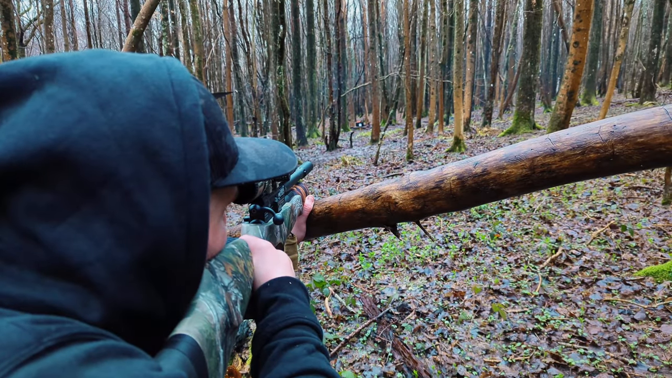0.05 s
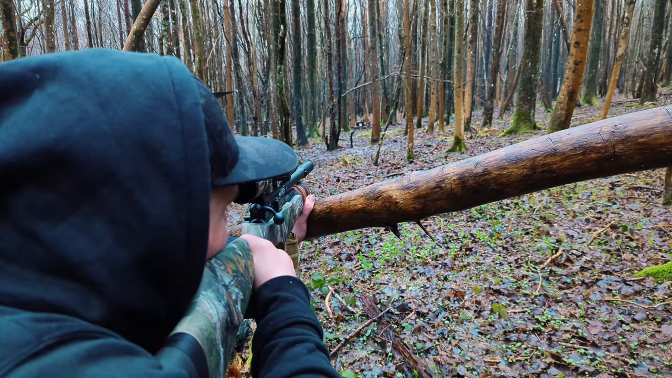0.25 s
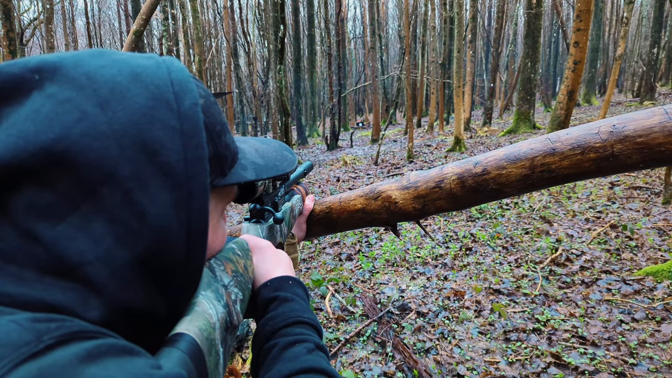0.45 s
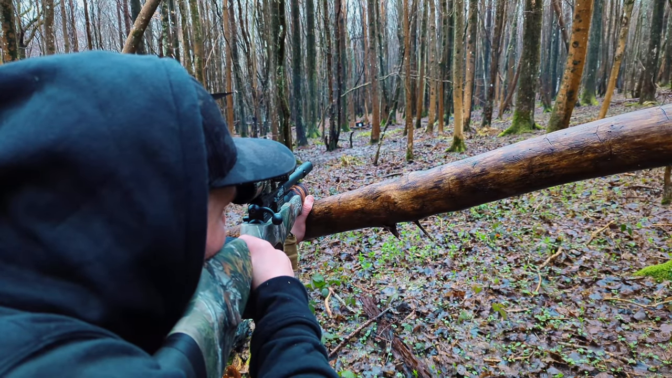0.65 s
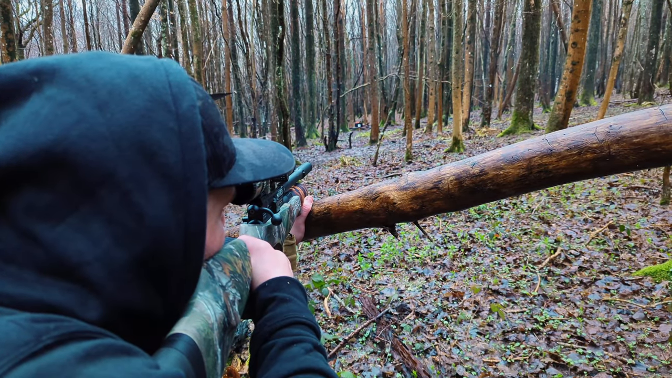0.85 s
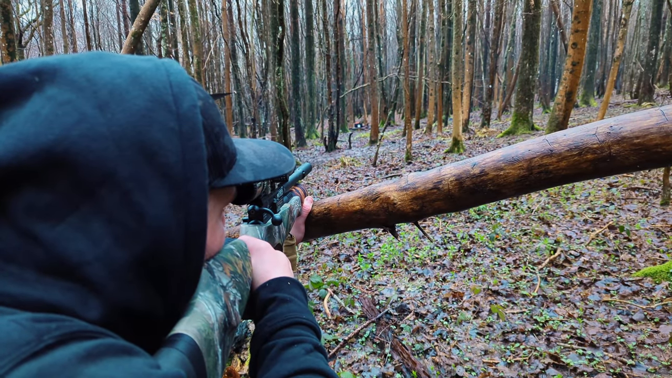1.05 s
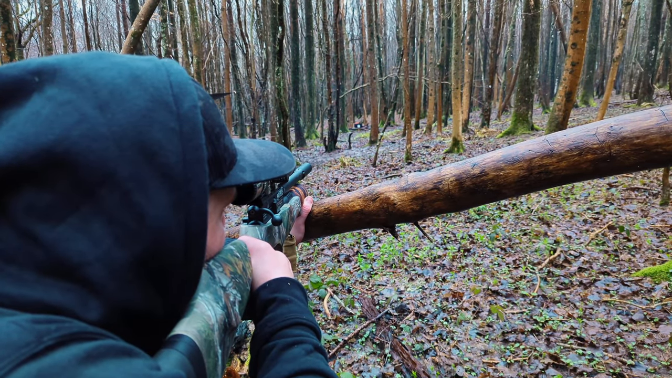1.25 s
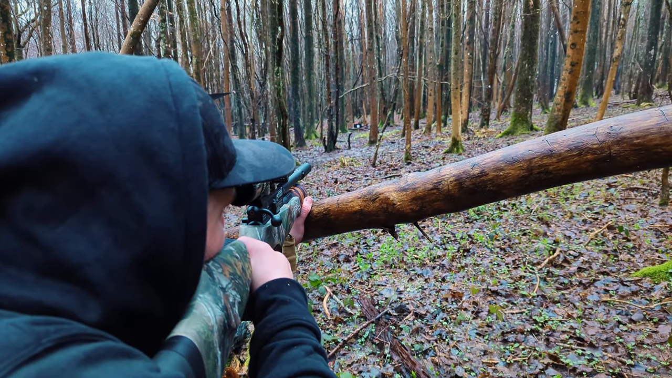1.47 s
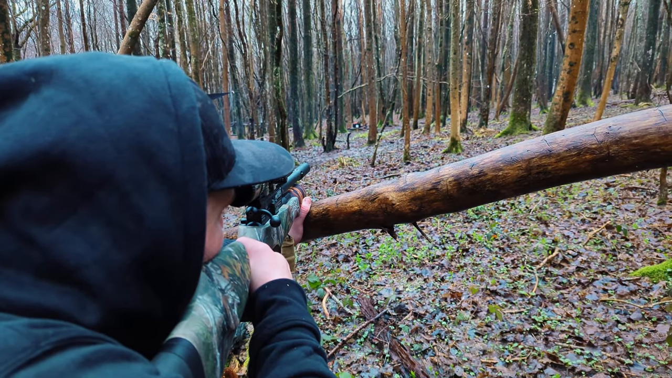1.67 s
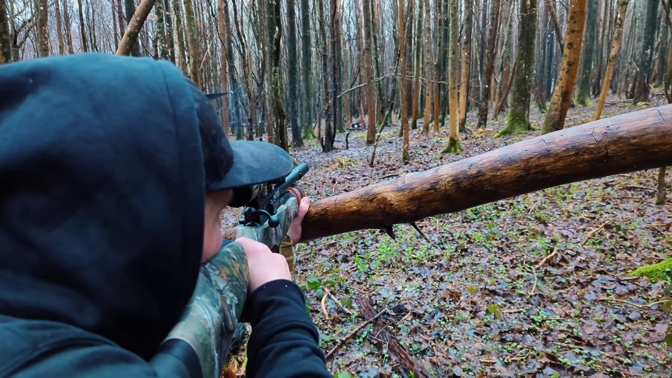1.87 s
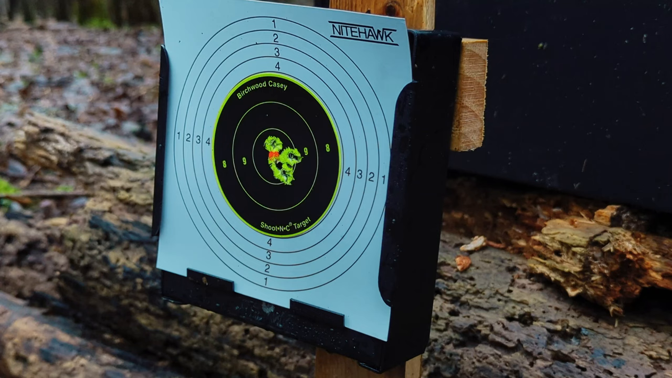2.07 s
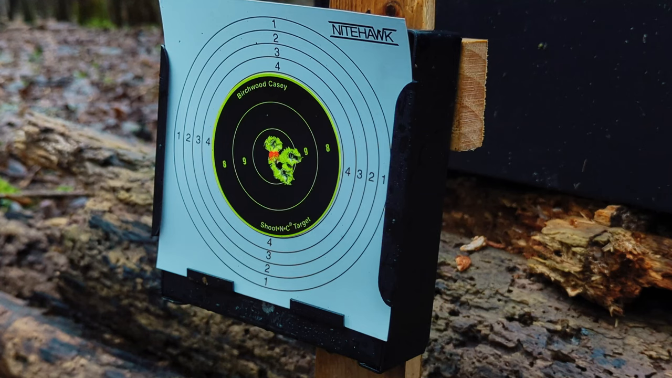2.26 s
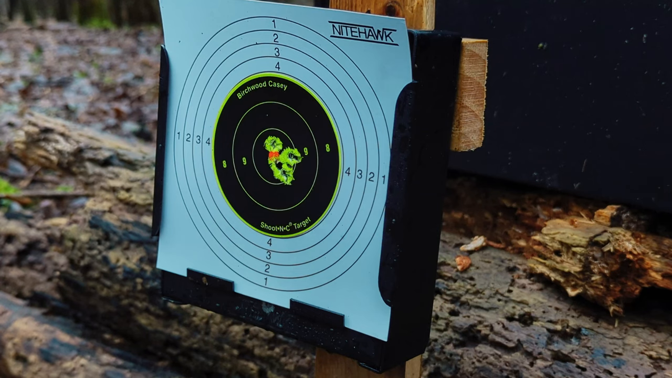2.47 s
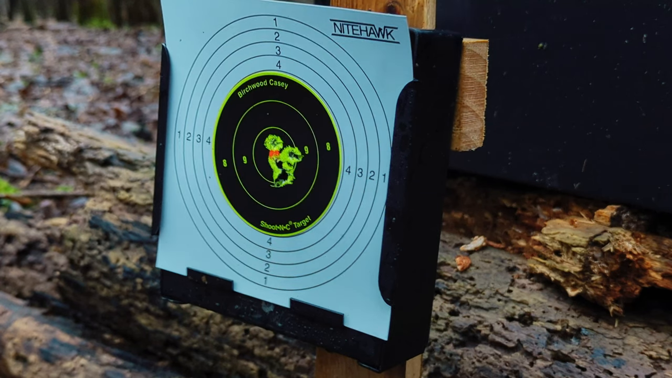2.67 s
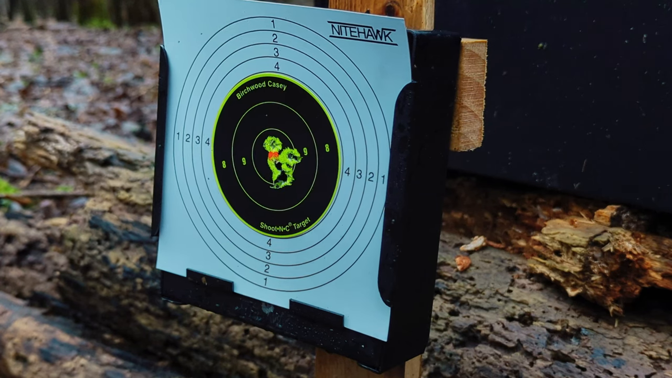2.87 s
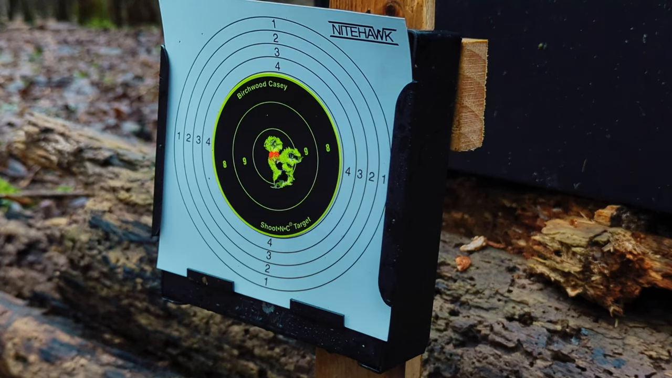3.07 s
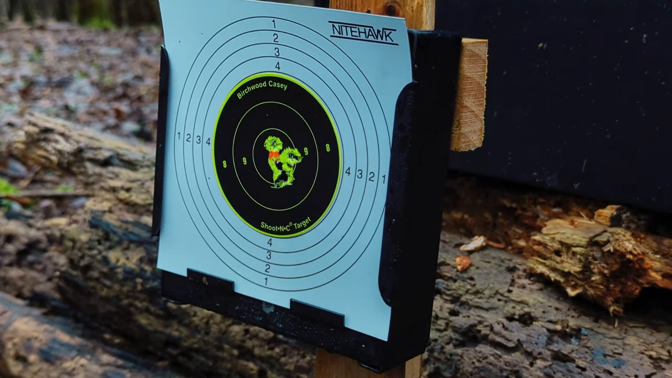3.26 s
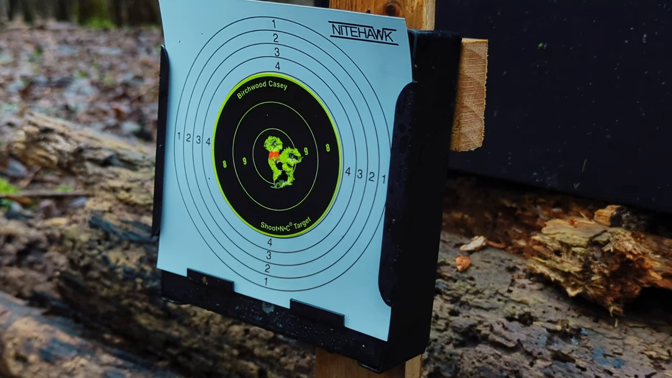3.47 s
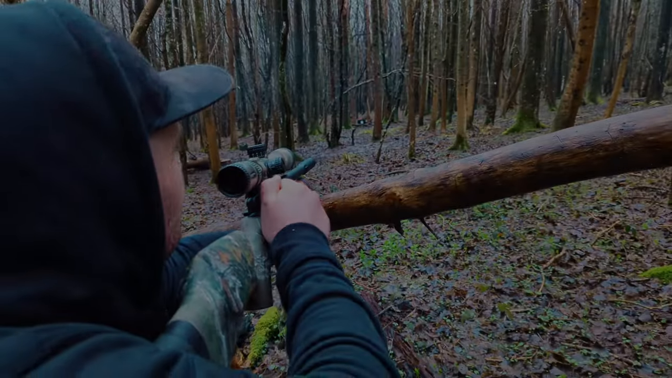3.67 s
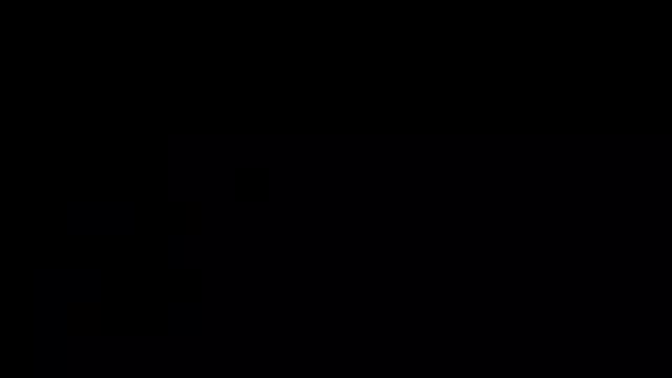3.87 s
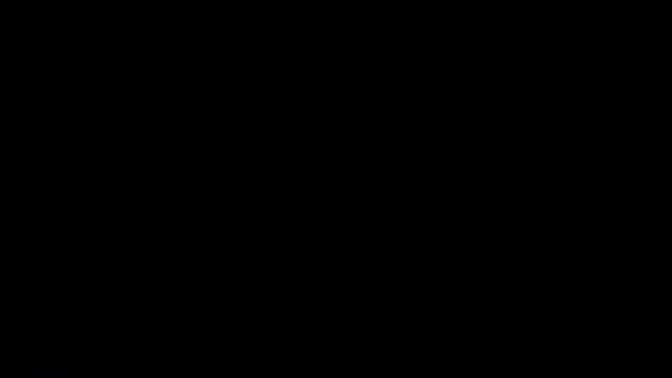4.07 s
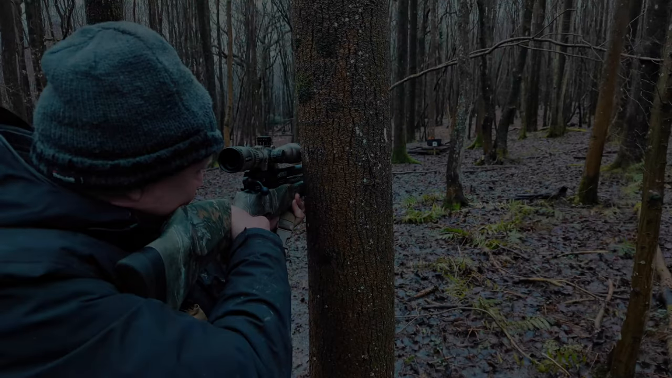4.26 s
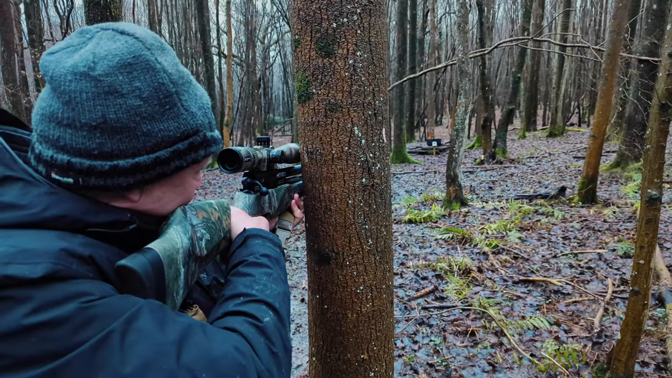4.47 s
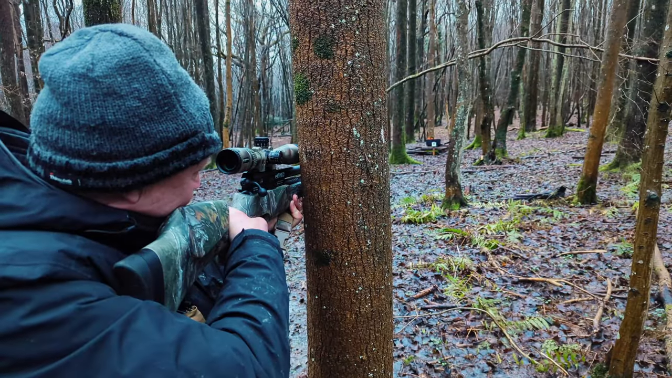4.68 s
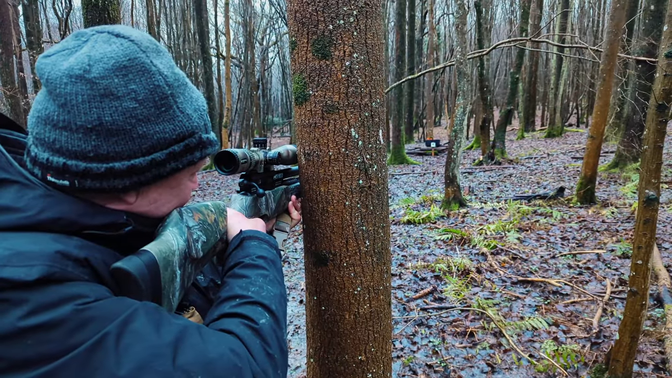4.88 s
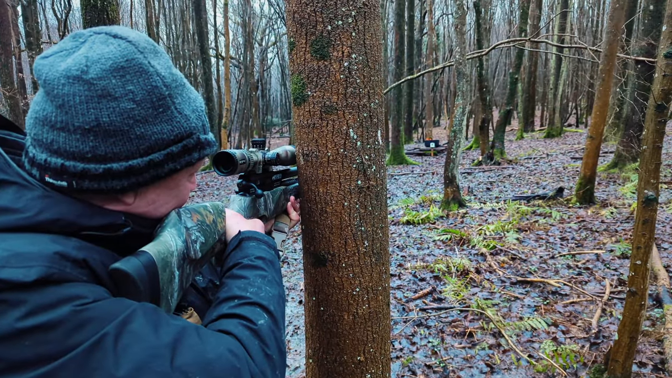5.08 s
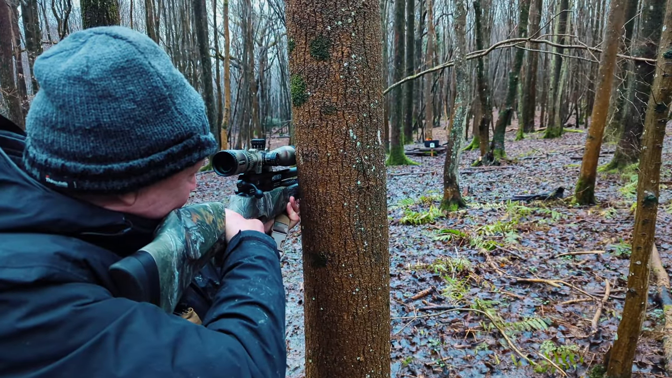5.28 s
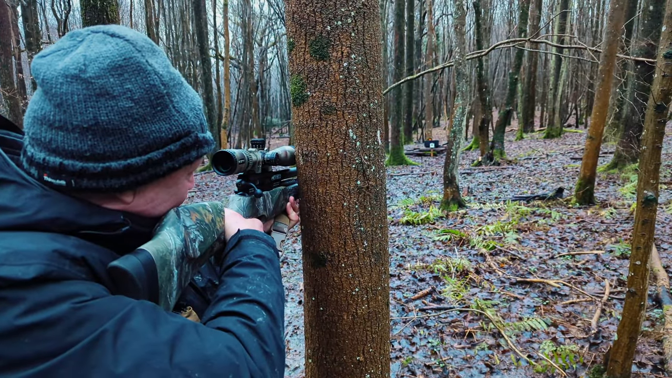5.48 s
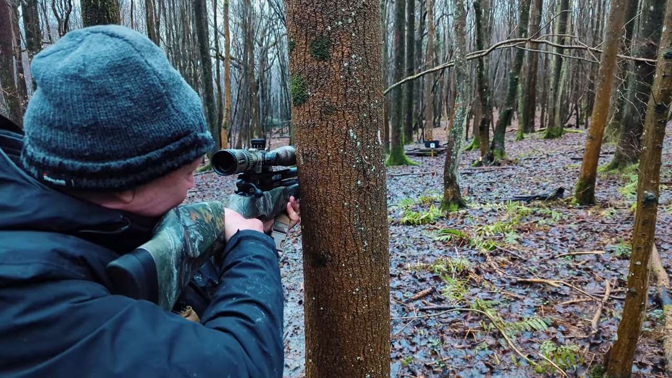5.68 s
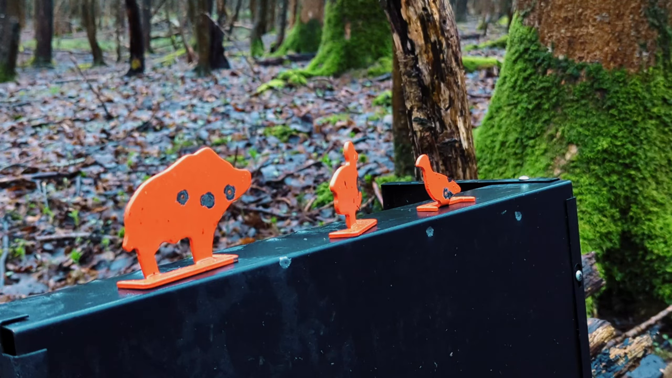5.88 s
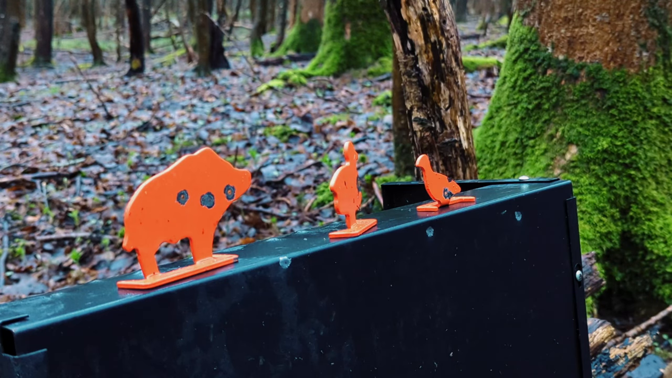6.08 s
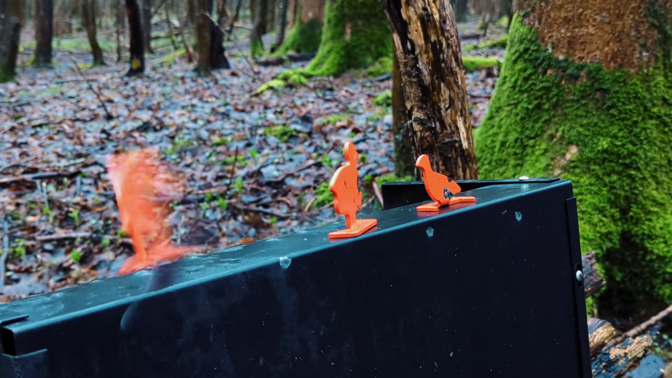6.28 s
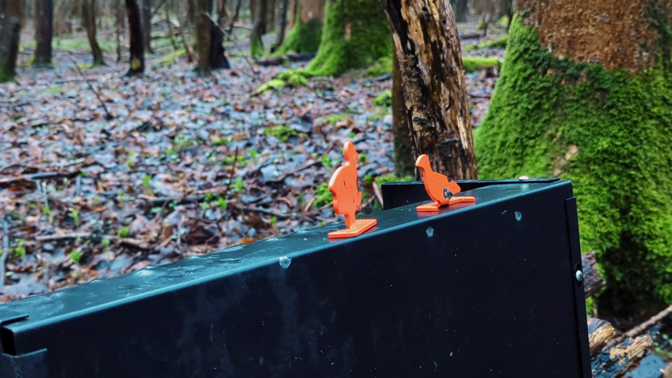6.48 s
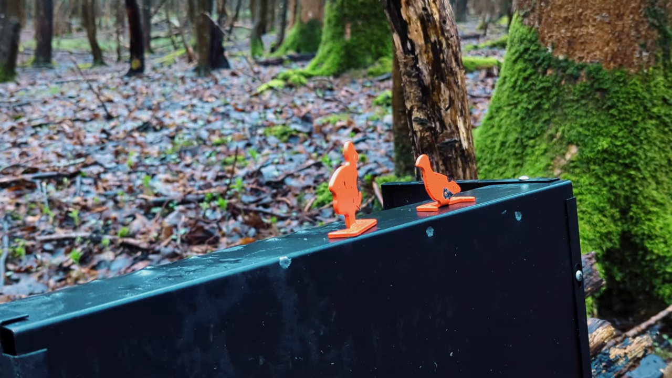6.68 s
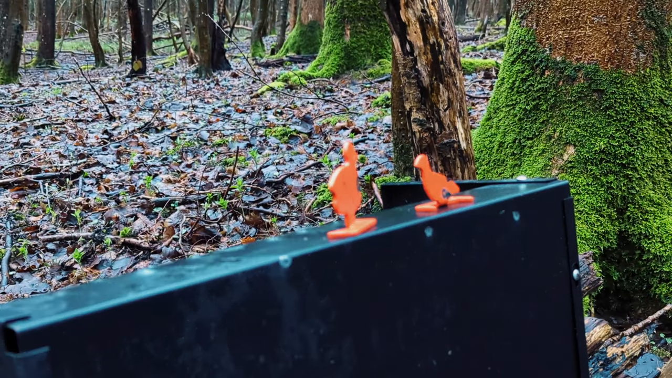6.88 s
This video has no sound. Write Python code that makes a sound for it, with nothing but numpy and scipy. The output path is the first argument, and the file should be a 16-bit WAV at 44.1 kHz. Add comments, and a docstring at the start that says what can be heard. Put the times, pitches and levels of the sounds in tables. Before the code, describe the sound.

Outdoors in bare woodland, close beside a spring air rifle: a sharp grainy snap, then a distant metallic smack. Close to the target, a faint report and hiss lead into a loud short clang of a steel trap. Cocking and loading clicks follow, then a second shot and a far bright ping. Suddenly, at a calmer place, a pellet knocks a small steel figure ringing into leaves. Wind buffets the microphone, mostly on the left.

```python
"""Spring air rifle in bare woodland

Beside the shooter, two shots burst and pop, and each hit rings back through the trees. In between, parts click
as the rifle is cocked and loaded. Beside the target, noise makes a faint report and the pellet's growing hiss;
then noise and fading sine waves make a steel pellet trap clang, or a small steel figure ring and tumble.
Slow random swells shape noise into wind buffeting the microphone and air in the trees; a small bird whistles."""
import sys
import numpy as np
from scipy import signal
from scipy.fft import rfft, irfft, next_fast_len
from scipy.io import wavfile
from scipy.ndimage import uniform_filter1d

SR = 44100
rng = np.random.default_rng(int(sys.argv[2]) if len(sys.argv) > 2 else 0)


def waveform_to_disk(signal):
    """Save audio, clipped to [-1, 1], as 16-bit WAV at the path in sys.argv[1]."""
    frames = np.transpose(np.atleast_2d(signal))
    scaled = np.clip(frames, -1, 1) * 32767
    samples = np.round(scaled).astype(np.int16)
    wavfile.write(sys.argv[1], SR, samples)


N = 305829

# In the tables, t60 is the time to fade by 60 dB, and side is the left level minus the right.
# Tilt brightens a sound (above 0) or dulls it (below 0).

# shots beside the shooter: [t/s, level/dB, gap between stages/s, tilt/dB per octave]
SHOTS = [(1.7189, -17.2, .0127, .9), (5.2278, -17.2, .0106, 1.3)]
# spring release, piston slam, rebound: [level relative to the shot/dB, hold/s, t60/s, side/dB]
ACTION_STAGES = [(.7, .0055, .038, -5.5), (-1.5, .007, .06, -2.5), (-4.5, .0095, .048, -1)]
# tone colour of the rifle's action: [f/Hz, level/dB]
ACTION_COLOUR = [(88, -32), (150, -2), (494, -2.3), (1420, -8.3), (1690, -10), (3160, -8.3), (8070, -13),
                 (8900, -12), (9630, -16), (11000, -12), (12400, -18), (13400, -12), (16000, -19)]
# pressure pops as the piston slams and rebounds: [t/s, level/dB, length/s]
PISTON_POPS = [(1.7227, -11, .0005), (1.7354, -7, .0004), (1.7455, -5, .0006), (1.7562, -16, .0005),
               (5.2304, -10, .0003), (5.2444, -8, .0003), (5.2543, -11, .0004), (5.2588, -12, .0005)]

# pellet strikes, each one row: [t/s, crack level/dB, crack hold/s, crack t60/s, side/dB,
# clatter level/dB, clatter t60/s, clatter swell/s, woodland echo level/dB]
TRAP_FAR_HIT = (1.993, -14.5, .004, .022, -2, -33, .25, .004, -27.5)
# the trap struck close by, same columns [t/s, level/dB, s, s, dB, level/dB, s, s, level/dB]
TRAP_NEAR_HIT = (2.5702, -11.5, .002, .03, -2, -21, .41, .01, -26)
# the figure struck far off, same columns [t/s, level/dB, s, s, dB, level/dB, s, s, level/dB]
FIGURE_FAR_HIT = (5.3781, -10, .0007, .009, -6, -27, .2, .006, -28)
# the figure struck close by, same columns [t/s, level/dB, s, s, dB, level/dB, s, s, level/dB]
FIGURE_NEAR_HIT = (6.3075, -10.8, .002, .021, -5, -25, .24, .018, -27)

# colour of the crack on the distant trap: [f/Hz, level/dB]
TRAP_FAR_CRACK = [(200, -35), (420, -14), (600, -2), (820, 3), (1350, -17), (2100, -10), (3000, -9),
                  (3600, 0), (4100, -10), (4550, -1), (5600, -10), (6400, -5), (9900, -8), (13000, -3),
                  (16000, -12)]
# colour of the crack on the nearby trap: [f/Hz, level/dB]
TRAP_NEAR_CRACK = [(88, -33), (150, -6), (280, -7), (923, 0), (2360, -7), (4320, -15), (6510, -10),
                   (8400, -16), (13700, -11), (16000, -21)]
# colour of the crack on the distant figure: [f/Hz, level/dB]
FIGURE_FAR_CRACK = [(400, -26), (1000, -22), (1600, -13), (3000, -2), (5000, -8), (8200, 2), (11000, -4.5),
                    (15000, -4)]
# colour of the crack on the nearby figure: [f/Hz, level/dB]
FIGURE_NEAR_CRACK = [(88, -31), (150, -1), (1350, 0), (3000, -9), (5680, -10), (7770, -17), (9260, -1),
                     (10800, -14), (13700, -4), (16000, -18)]
# colour of the trap's clatter: [f/Hz, level/dB]
TRAP_CLATTER = [(200, -16), (400, -10), (750, 0), (1300, -4), (2500, 1), (4000, 0), (8000, 1.3),
                (12000, -1), (16000, -5)]
# colour of the distant figure's clatter: [f/Hz, level/dB]
FIGURE_FAR_CLATTER = [(300, -14), (1200, -11), (3000, -3), (5000, -1), (8500, 1.5), (11000, 0), (13000, -6),
                      (16000, -8)]
# colour of the nearby figure's clatter: [f/Hz, level/dB]
FIGURE_NEAR_CLATTER = [(150, -2), (330, -4), (650, 1), (1500, -.5), (2300, -5), (3200, -12), (5000, -3),
                       (8000, 0), (10000, 1), (14000, 1), (16000, -8)]

# ringing tones of the trap's sheet steel: [f/Hz, t60/s, near level/dB, far level/dB, side/dB]
TRAP_MODES = [(502, .27, -28.5, -56, 4), (720, .2, -34, -48, 3), (775, .13, -17, -32.5, 1),
              (792, .15, -12.5, -30.5, 3), (935, .17, -32, -58, -3), (1150, .2, -32, -60, 2),
              (1183, .21, -11, -53, 2), (1598, .18, -28, -50, -1), (1858, .2, -27, -40, -1),
              (2142, .22, -24.5, -55, 1), (2258, .16, -23, -42, 4), (2382, .14, -23.5, -56, 4),
              (2640, .2, -26, -37, -2), (2810, .2, -31, -43, 0), (3660, .15, -36, -40, 0)]
# ringing tones of the steel figure: [f/Hz, t60/s, near level/dB, far level/dB, side/dB]
FIGURE_MODES = [(1312.5, 1.0, -31, -62, 0), (2044, .75, -35, -57, 5), (2670, .7, -16.5, -54, 2),
                (2683, .66, -22, -55, 2), (2700, .66, -26, -60, 2), (3763, .54, -25.5, -55, 6),
                (4819, .29, -17, -48, -1), (5131, .34, -25, -53, -1), (5850, .26, -28, -55, -2),
                (8958, .5, -38, -40, 1), (9392, .35, -15.5, -31, -1), (9435, .35, -22, -40, -1),
                (10290, .33, -19.5, -30, -5), (11590, .5, -36, -31, -5), (13310, .36, -26, -42, -3),
                (14568, .23, -21, -29, -7), (15380, .22, -26, -35, -3)]
# ringing tones of the sheet-steel box under the figure: [f/Hz, t60/s, level/dB]
BOX_MODES = [(472, .3, -39), (545, .26, -42), (743, .3, -36), (969, .28, -39)]
# the figure drops among the leaves: [t/s, level/dB, t60/s, side/dB, tilt/dB per octave]
TUMBLES = [(6.577, -38, .06, 3, -1), (6.678, -36, .08, 2, 0), (6.684, -41, .1, 2, -6),
           (6.862, -50, .08, 0, -3)]
# colour of those knocks: [f/Hz, level/dB]
TUMBLE_COLOUR = [(80, 6), (300, 0), (620, 8), (1100, -3), (2500, -2), (6000, -10), (11000, -12),
                 (14500, -3)]

# small clicks of lever, breech and twigs: [t/s, level/dB, t60/s, side/dB, tilt/dB per octave]
CLICKS = [(.814, -54, .05, -1, 0), (1.214, -58, .03, 1, 0), (1.866, -48, .04, -2, 0),
          (3.1787, -34.5, .03, -2, 3), (3.2021, -25, .06, -2, -.3), (3.212, -39, .3, -1, -1.5),
          (3.243, -18.5, .045, -4, 1.8), (3.249, -21.5, .05, -5, 1.2), (3.5099, -46, .1, 0, -2),
          (3.6117, -31.5, .045, -2, 1.5), (3.645, -46, .15, -1, -1), (3.6641, -23, .04, -2, .6),
          (3.8067, -32.5, .035, -4, 4), (3.8262, -31.5, .055, -2, -2), (4.0447, -43.5, .07, -3, 0),
          (4.0624, -45, .08, -4, 0), (4.0836, -47, .07, -3, -2)]
# colour of the clicks: [f/Hz, level/dB]
CLICK_COLOUR = [(150, -8), (600, 5), (1400, 3), (2200, -.5), (3400, 1.5), (6000, -3), (11000, -2),
                (16000, -4)]
# the rifle's report as it reaches the targets: [t/s, level/dB, t60/s, side/dB, tilt/dB per octave]
REPORTS = [(2.519, -26.5, .07, 0, 0), (2.531, -31.5, .16, 0, -2), (6.2545, -28, .08, -2, 0),
           (6.2675, -28, .1, -1, -2)]
# colour of the reports: [f/Hz, level/dB]
REPORT_COLOUR = [(100, 0), (400, 6), (900, -5), (2200, 1), (5000, -2), (16000, -4)]
# pellets nearing the target: [arrival t/s, level/dB, swell/s, side/dB]
FLIGHTS = [(2.57, -24, .016, -2), (6.303, -16.5, .013, -9)]
# colour of the pellet's hiss: [f/Hz, level/dB]
FLIGHT_COLOUR = [(500, -25), (3000, -15), (7000, -7), (12000, -1), (16000, 0)]
# low thuds of stock, target boxes and wind:
# [t/s, level/dB, f/Hz, t60/s, side/dB, phase between the sides/turns]
THUDS = [(1.738, -24, 220, .06, 0, 0), (5.254, -22.5, 210, .05, 0, 0), (2.569, -23, 170, .03, 0, .3),
         (2.58, -15, 52, .15, 0, .44), (5.588, -13, 90, .08, 14, 0), (5.726, -25, 120, .06, -8, 0),
         (6.262, -34, 135, .05, 0, 0), (6.3075, -28, 135, .05, 0, 0), (6.309, -16, 52, .15, -2, .1),
         (6.676, -36, 110, .08, 0, 0)]

# a small bird's thin falling notes: [t/s, length/s, first f/Hz, last f/Hz, level/dB]
BIRD_NOTES = [(5.865, .175, 7950, 7150, -64), (6.105, .045, 5900, 5600, -72), (6.12, .04, 4750, 4300, -71)]
# how long the wood's echo lasts at each pitch: [f/Hz, t60/s]
WOOD_T60 = [(200, 1.0), (800, 1.35), (2500, 1.4), (6000, 1.17), (10000, .92), (15000, .67)]
# gusts that buffet the microphone: [t of peak/s, level/dB, length/s, side/dB]
GUSTS = [(.8, -39, .5, -14), (1.32, -38, .1, 2), (1.58, -36.5, .35, -3), (1.95, -41, .2, -12),
         (2.33, -36, .14, 2), (2.72, -30.5, .07, 12), (2.84, -37, .13, 12), (3.11, -36, .06, 18),
         (3.3, -29.5, .08, 20), (3.44, -36.5, .15, 14), (3.73, -35, .09, 18), (4.25, -41, .06, 15),
         (4.47, -29, .16, 20), (4.91, -28, .07, 17), (5.15, -26, .11, 22), (5.335, -33, .04, -3),
         (5.49, -21.5, .09, 7), (5.6, -24, .05, 14), (5.68, -30, .12, -3)]
# colour of wind on the microphone: [f/Hz, level/dB]
WIND_COLOUR = [(15, -42), (30, -17), (45, -1.5), (65, 1.5), (120, -4), (185, -11.7), (300, -21), (420, -32),
               (900, -70), (3000, -130)]
# colour of the air in the trees: [f/Hz, level/dB]
AIR_COLOUR = [(80, -12), (220, -1), (500, -6.8), (1000, -12.8), (2000, -18.2), (3000, -22.5), (4400, -33.5),
              (8000, -44), (16000, -54)]
# colour of the microphone's own noise: [f/Hz, level/dB]
HISS_COLOUR = [(500, 0), (4500, 3), (9000, 1), (11000, -2), (16000, -2)]

T = np.arange(int(1.5 * SR)) / SR  # seconds within one event
CLOCK = np.arange(N) / SR  # seconds from the start

CUT_S = 5.77  # the shooter's place gives way abruptly to the sheltered target
LANDING_S, LANDING_DB = 6.678, -5  # the leaves damp the figure as it lands
CLATTER_PEAKS_DB, CLATTER_SPACING_HZ = 4, 22  # the small modes of struck steel stand out unevenly
CLICK_PEAKS_DB, CLICK_SPACING_HZ = 2.2, 220  # each knock has broad resonances of its own
BREEZE_DB, BREEZE_EASES_DB_PER_S, BREEZE_SIDE_DB = -38.3, -.6, -1  # rumble: starting level, easing, side
GUST_TILT_DB = .15  # tilt per octave for each dB by which a gust exceeds BREEZE_DB
AIR_DB = -51  # the rush of air in the trees around the shooter
SHELTER_BREEZE_DB, SHELTER_AIR_DB = -51.5, -60.5  # both at the last target
DIP_S, DIP_LENGTH_S, DIP_BREEZE_DB, DIP_AIR_DB = 4.06, .45, -5.5, -4.5  # the background dips briefly
EDGE_HZ = 16200  # upper edge of the sound


def amp(db):
    """Turns decibels into gain."""
    return 10 ** (np.asarray(db) / 20)


def unit(x):
    """Scales to an average strength (rms) of 1."""
    return x / np.sqrt(np.mean(x ** 2) + 1e-20)


def read(points, hz):
    """Reads a table's value at hz, on a log pitch axis."""
    f, value = np.transpose(points)
    return np.interp(np.log(hz + 1), np.log(f + 1), value)


def pan(db):
    """Left and right gains for a level difference."""
    gains = amp([[db / 2], [-db / 2]])
    return unit(gains)


def fade(t, t60):
    """Dies away by 60 dB every t60 seconds."""
    return np.exp(-np.log(1000) * t / t60)


def swelling(t60, swell):
    """An envelope of peak 1 that swells for a moment before it dies away."""
    shape = fade(T, t60) * amp(-38 * np.exp(-T / swell))
    return shape / shape.max()


def hump(t, length):
    """A bell of height 1 around t = 0; it is above half height for the given length."""
    return .5 ** ((2 * t / length) ** 2)


def add(mix, s, sound):
    """Mixes a stereo sound in at time s."""
    part = mix[:, round(s * SR):][:, :sound.shape[1]]
    part += sound[:, :part.shape[1]]


def noise(size, colour, alike_hz, tilt_db=0):
    """Coloured stereo noise: the sides are much alike well below alike_hz and unrelated far above."""
    n = next_fast_len(size)
    hz = np.fft.rfftfreq(n, 1 / SR)
    left, other = rfft(rng.standard_normal((2, n)))
    same = .95 / (1 + (hz / alike_hz) ** 2)
    right = same * left + np.sqrt(1 - same ** 2) * other
    gain = amp(read(colour, hz) + tilt_db * np.log2(1 + hz / 500))
    return unit(irfft(np.array([left, right]) * gain, n)[:, :size])


def drift(size, hz):
    """Slow random wander for each side, with a joint rms of 1."""
    return noise(size, [(hz, 0), (2 * hz, -20), (10 * hz, -120)], hz)


def resonant(x, peaks_db, spacing_hz):
    """Gives a steady noise random resonances, about spacing_hz apart."""
    n = next_fast_len(x.shape[1])
    hz = np.fft.rfftfreq(n, 1 / SR)
    heights = rng.standard_normal(size=4000)
    gain = amp(peaks_db * np.interp(hz / spacing_hz, np.arange(len(heights)), heights))
    return unit(irfft(rfft(x, n) * gain, n)[:, :x.shape[1]])


def burst(db, hold, t60, colour, alike_hz, tilt_db=0):
    """A sharp burst of noise that holds, then dies."""
    t = T[:SR // 4]
    return amp(db) * noise(len(t), colour, alike_hz, tilt_db) * fade(np.maximum(t - hold, 0), t60)


def scatter(colour, rise):
    """Sound scattered by trunks: dense, uneven echoes that die at different rates by pitch."""
    hz, t, bands = signal.stft(noise(len(T), colour, 400), SR, nperseg=256)
    clumps = unit(uniform_filter1d(rng.standard_normal(len(t)), size=5))
    bands = bands * fade(t, read(WOOD_T60, hz)[:, None]) * amp(.9 * clumps)
    echoes = signal.istft(bands, SR, nperseg=256)[1][:, :len(T)]
    return echoes * (1 - np.exp(-T / rise))


def echo_through(x, tail):
    """Repeats a sound through every tiny echo in a tail."""
    return signal.fftconvolve(x, tail / np.linalg.norm(tail[0]), axes=1)[:, :x.shape[1]]


def woodland(x):
    """The wood's echo: trunks scatter a sound into a slowly fading tail."""
    return echo_through(x, scatter([(100, -2), (1000, 0), (16000, -1)], .012))


def rifle():
    """Each shot is three overlapping bursts of grainy noise, with sharp pops of pressure from the piston."""
    out = np.zeros((2, N))
    for s, shot_db, gap, tilt_db in SHOTS:
        for k, (db, hold, t60, side_db) in enumerate(ACTION_STAGES):
            stage = burst(shot_db + db, hold, t60, ACTION_COLOUR, 2200, tilt_db)
            add(out, s + k * gap, pan(side_db) * stage)
    out *= unit(amp(2.2 * drift(N, 600)[0]))  # grainy: the loudness wavers quickly and at random
    for s, db, length in PISTON_POPS:
        u = T[:SR // 50] / length
        add(out, s, pan(0) * amp(db) * (1 - u) * np.exp(-u))  # a push, then a weaker pull
    t = T[:SR // 2]
    early = noise(len(t), [(200, 1), (1200, 4), (6000, 0), (16000, -1)], 900) * fade(t, .2)
    nearby = echo_through(out, pan(-1.5) * early)  # off the nearest trunks
    return out + amp(-16) * nearby + amp(-23) * woodland(out)


def ring(modes, far, swell, sway, spin_hz, spin_depth, spread_hz):
    """Steel rings in fading tones; as it sways and turns, its path (sway, in s) and loudness waver."""
    out, late = np.zeros((2, len(T))), sway * drift(len(T), 30)
    for hz, t60, near_db, far_db, side_db in modes:
        start, facing = rng.uniform(0, 2 * np.pi, 2)
        # short waves reach the two sides out of step
        apart = np.array([[0], [np.pi * min(hz / spread_hz, .78)]])
        turning = 1 + spin_depth * np.cos(2 * np.pi * spin_hz * T + facing) * (1 - fade(T, .6))
        tone = np.sin(2 * np.pi * hz * (T + late) + start + apart)
        level = amp(far_db if far else near_db)
        out += pan(side_db) * level * swelling(t60, swell) * turning * tone
    return out


def strike(hit, crack_colour, clatter_colour, alike_hz, steel, steel_echo):
    """A pellet cracks on steel: countless small modes clatter, a few ring on, and the wood answers."""
    s, crack_db, hold, crack_t60, side_db, clatter_db, clatter_t60, swell, echo_db = hit
    out = np.zeros((2, N))
    add(out, s, pan(side_db) * burst(crack_db, hold, crack_t60, crack_colour, alike_hz))
    small_modes = resonant(noise(len(T), clatter_colour, 900), CLATTER_PEAKS_DB, CLATTER_SPACING_HZ)
    clatter = amp(clatter_db) * small_modes * swelling(clatter_t60, swell)
    echo = amp(echo_db) * scatter(clatter_colour, .008)
    add(out, s, pan(side_db / 2) * (clatter + echo))
    add(out, s, steel + steel_echo)
    return out


def trap():
    """The sheet-steel trap, struck far off and then close by; the wood echoes what it radiates afar."""
    far = ring(TRAP_MODES, True, swell=.001, sway=.00002, spin_hz=9, spin_depth=.1, spread_hz=9000)
    near = ring(TRAP_MODES, False, swell=.028, sway=.00004, spin_hz=9, spin_depth=.1, spread_hz=4500)
    far_hit = strike(TRAP_FAR_HIT, TRAP_FAR_CRACK, TRAP_CLATTER, 7000, far, amp(1.5) * woodland(far))
    near_hit = strike(TRAP_NEAR_HIT, TRAP_NEAR_CRACK, TRAP_CLATTER, 900,
                      amp(-1.5) * near, amp(2) * woodland(far))
    return far_hit + near_hit


def figure_far():
    """The steel figure pings from deep in the wood, its tones fading at different rates."""
    steel = ring(FIGURE_MODES, True, swell=.002, sway=.00003, spin_hz=12, spin_depth=.3, spread_hz=9000)
    return strike(FIGURE_FAR_HIT, FIGURE_FAR_CRACK, FIGURE_FAR_CLATTER, 2000,
                  steel, amp(-3) * woodland(steel))


def figure_near():
    """The steel figure is knocked spinning off its box, which rings dully; the figure lands."""
    steel = ring(FIGURE_MODES, False, swell=.02, sway=.000015, spin_hz=12, spin_depth=.5, spread_hz=3400)
    box = np.zeros(len(T))
    for hz, t60, db in BOX_MODES:
        box += amp(db) * swelling(t60, .004) * np.sin(2 * np.pi * hz * T)
    landed = np.clip((FIGURE_NEAR_HIT[0] + T - LANDING_S) / .03, 0, 1)  # 0 in the air, 1 on the ground
    ringing = steel * amp(LANDING_DB * landed) + pan(0) * box
    hit = strike(FIGURE_NEAR_HIT, FIGURE_NEAR_CRACK, FIGURE_NEAR_CLATTER, 300,
                 ringing, amp(-28) * woodland(steel))
    return hit + knocks(TUMBLES, TUMBLE_COLOUR, -14)


def knocks(rows, colour, echo_db):
    """Short dry knocks: fading noise with random resonances, and its echo in the wood."""
    out, t = np.zeros((2, N)), T[:SR // 4]
    for s, db, t60, side_db, tilt_db in rows:
        body = resonant(noise(len(t), colour, 900, tilt_db), CLICK_PEAKS_DB, CLICK_SPACING_HZ)
        add(out, s, pan(side_db) * amp(db) * body * fade(t, t60))
    return out + amp(echo_db) * woodland(out)


def flights():
    """The hiss of a pellet grows until it arrives."""
    out, t = np.zeros((2, N)), T[:SR // 20]
    for s, db, swell, side_db in FLIGHTS:
        hiss = noise(len(t), FLIGHT_COLOUR, 500) * np.exp((t - t[-1]) / swell)
        add(out, s - t[-1], pan(side_db) * amp(db) * hiss)
    return out


def thuds():
    """Heavily damped low tones, a few cycles each."""
    out = np.zeros((2, N))
    for s, db, hz, t60, side_db, apart in THUDS:
        cycles = np.sin(2 * np.pi * (hz * T + np.array([[0], [apart]])))
        add(out, s, pan(side_db) * amp(db) * swelling(t60, .005) * cycles)
    return out


def bird():
    """Faint falling whistles with a slight waver, blurred by the trees."""
    call = np.zeros((2, N))
    for s, length, first_hz, last_hz, db in BIRD_NOTES:
        u = T[T < length] / length
        waver = 70 * drift(len(T), 90)[0, :len(u)]
        hz = first_hz + (last_hz - first_hz) * u + waver
        whistle = np.sin(np.pi * u) * np.sin(2 * np.pi * np.cumsum(hz) / SR)
        add(call, s, pan(-3) * amp(db) * whistle)
    return call + amp(-1) * woodland(call)


def gusts():
    """Gusts swell and pass, many mostly on one side of the microphone; stronger ones are brighter."""
    out = np.zeros((2, N))
    for s, db, length, side_db in GUSTS:
        t = np.arange(-1.5 * length, 1.5 * length, 1 / SR)
        eddies = noise(len(T), WIND_COLOUR, 25, GUST_TILT_DB * (db - BREEZE_DB))[:, :len(t)]
        swell = hump(t[:eddies.shape[1]], length)
        # both sides get the strength of the swell itself, whatever the random eddies
        puff = np.array([unit(side * swell) for side in eddies]) * np.sqrt(np.mean(swell ** 2))
        add(out, max(s + t[0], 0), pan(side_db) * amp(db) * puff)
    return out


def background(open_db, sheltered_db, dip_db):
    """Gain of a background sound: open level with a brief dip, then the last target's sheltered level."""
    dipping_db = open_db + dip_db * hump(CLOCK - DIP_S, DIP_LENGTH_S)
    return amp(np.where(CLOCK < CUT_S, dipping_db, sheltered_db))


def breeze():
    """Lumpy wind rumble on the microphone, slowly easing around the shooter."""
    rumble = unit(noise(N, WIND_COLOUR, 40) * amp(1.6 * drift(N, 8)))
    open_db = BREEZE_DB + BREEZE_EASES_DB_PER_S * CLOCK
    return pan(BREEZE_SIDE_DB) * rumble * background(open_db, SHELTER_BREEZE_DB, DIP_BREEZE_DB)


def air():
    """The soft rush of air in the trees: gently wavering noise."""
    rush = noise(N, AIR_COLOUR, 700) * amp(.7 * drift(N, 8))
    return pan(-1) * rush * background(AIR_DB, SHELTER_AIR_DB, DIP_AIR_DB)


def scene():
    """Shots, earlier hits and clicks stop at the abrupt change of place; the other sounds join them."""
    before = rifle() + trap() + figure_far() + knocks(CLICKS, CLICK_COLOUR, -17)
    before *= np.clip((CUT_S - CLOCK) / .004, 0, 1)
    hits = before + figure_near() + knocks(REPORTS, REPORT_COLOUR, -10) + flights() + thuds()
    return hits + breeze() + gusts() + air() + bird()


def record(dry):
    """The microphone adds hiss and loses deep bass; then the highest treble is cut off."""
    hissing = dry + pan(-1.5) * amp(-70.3) * noise(N, HISS_COLOUR, 300)
    bass_cut = signal.butter(2, 30, "highpass", fs=SR, output="sos")
    thinned = signal.sosfilt(bass_cut, hissing)
    treble_cut = signal.firwin(101, EDGE_HZ, window=("kaiser", 8), fs=SR)
    return signal.oaconvolve(thinned, treble_cut[None], "same")


dry = scene()
out = record(dry)
waveform_to_disk(out)
```